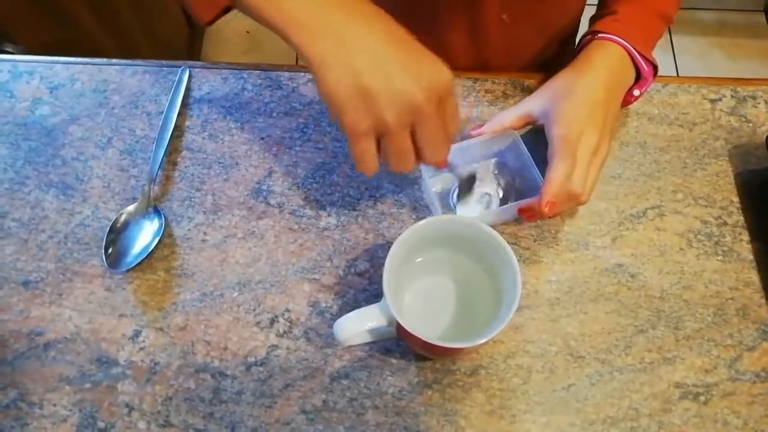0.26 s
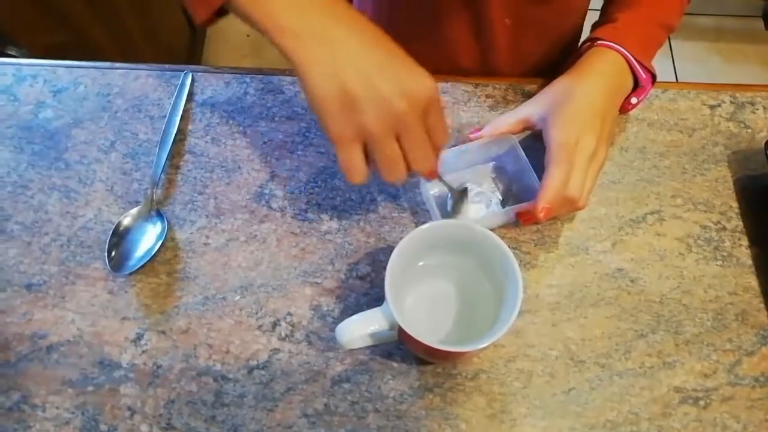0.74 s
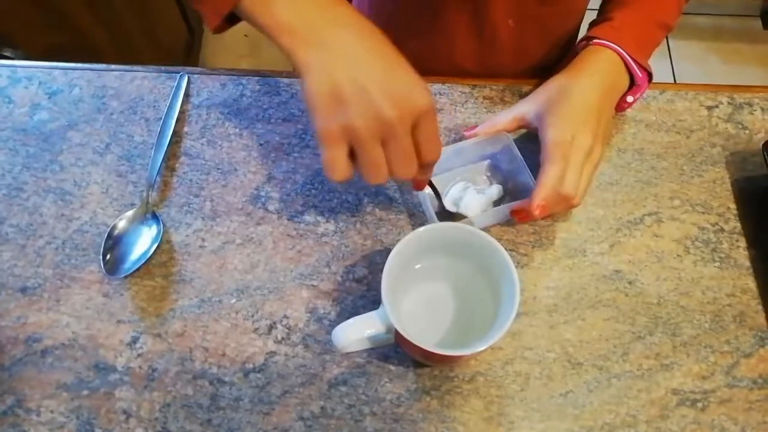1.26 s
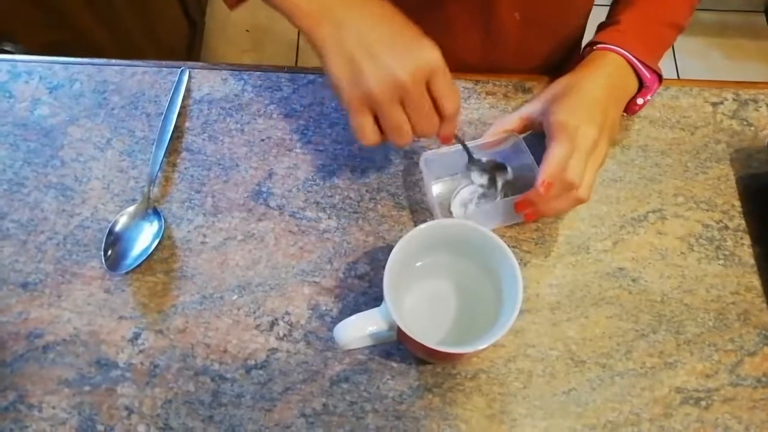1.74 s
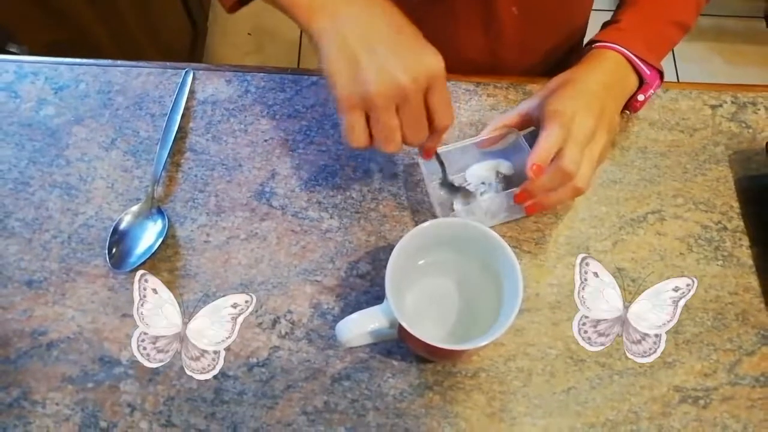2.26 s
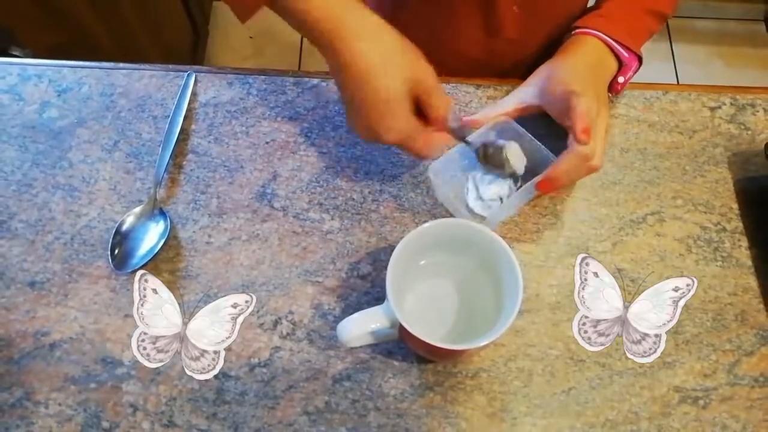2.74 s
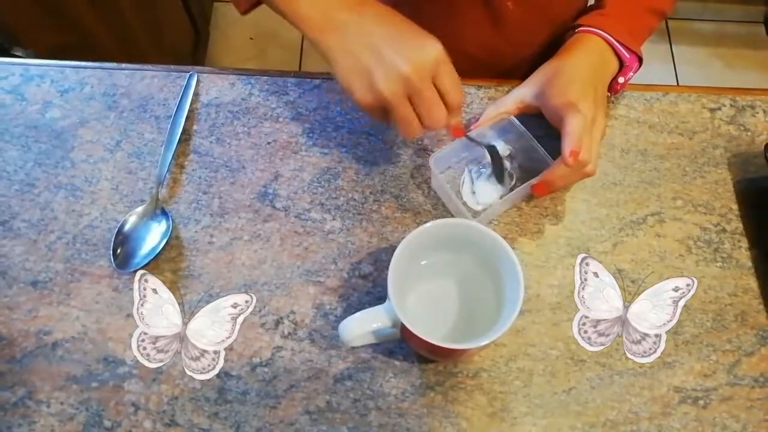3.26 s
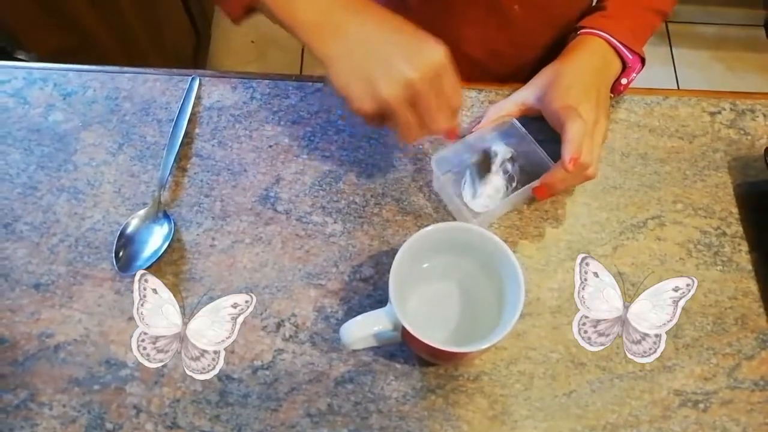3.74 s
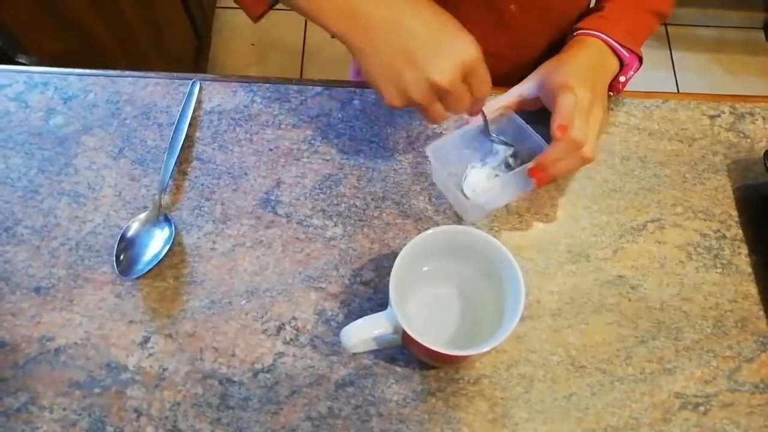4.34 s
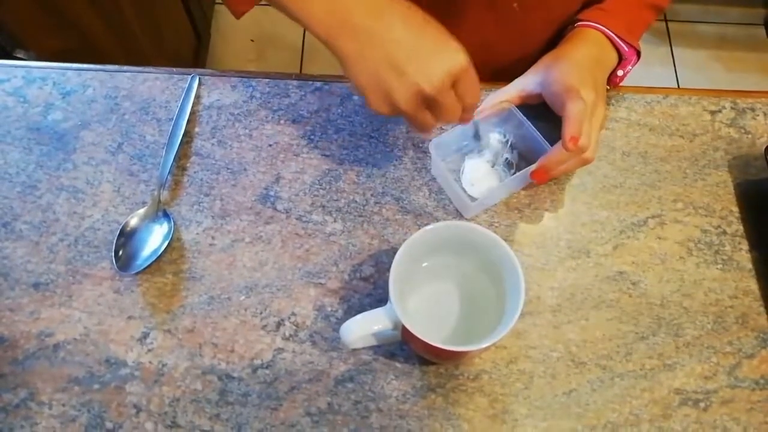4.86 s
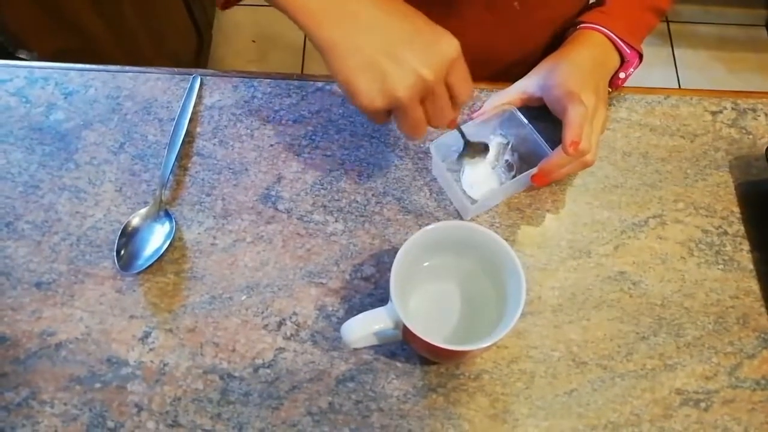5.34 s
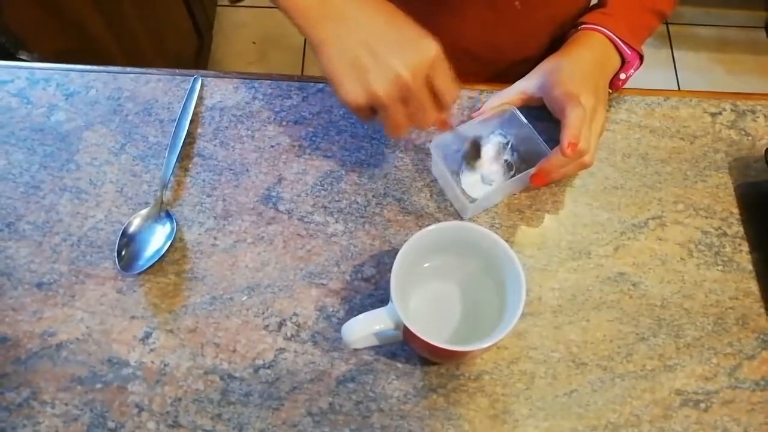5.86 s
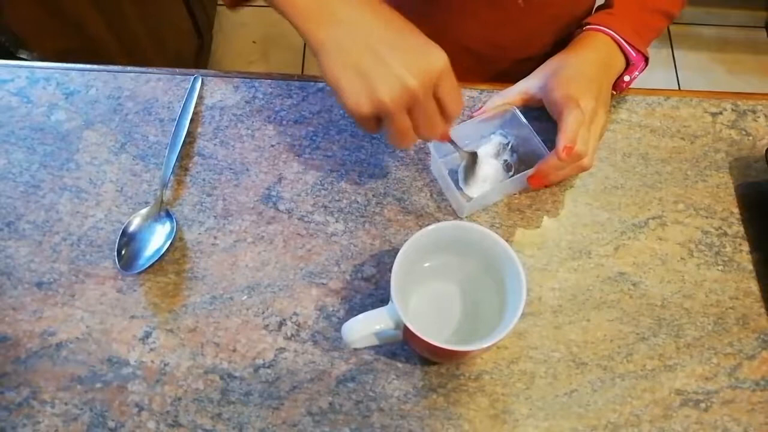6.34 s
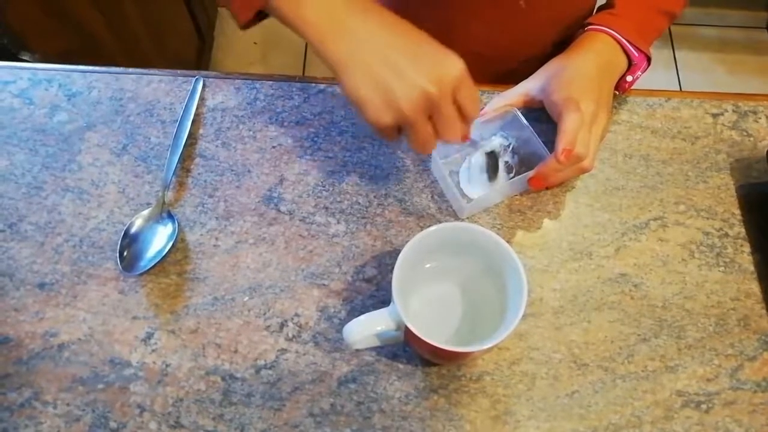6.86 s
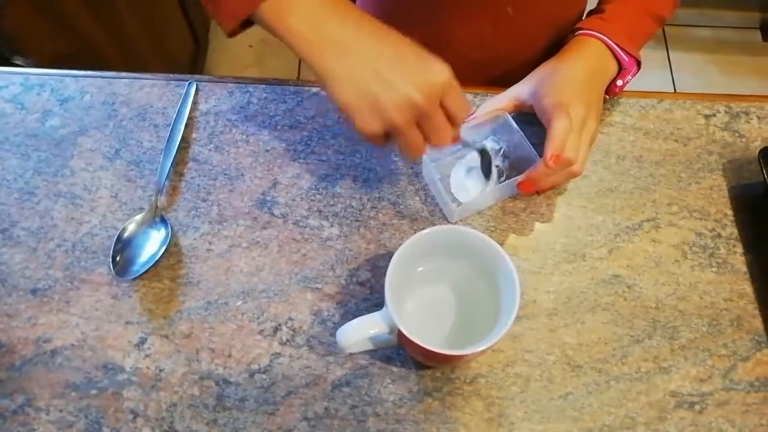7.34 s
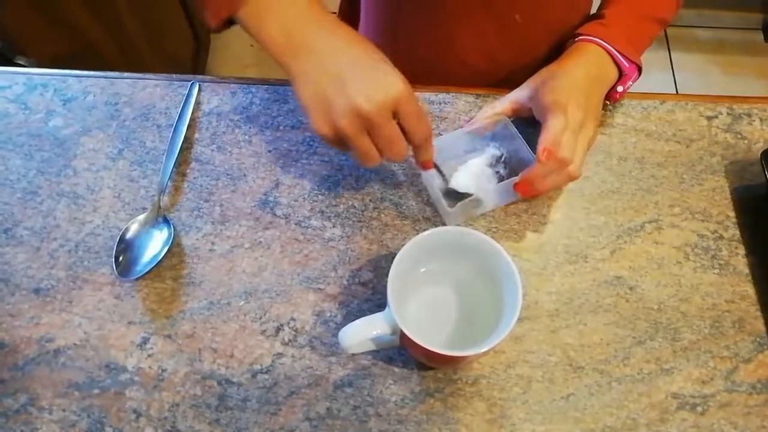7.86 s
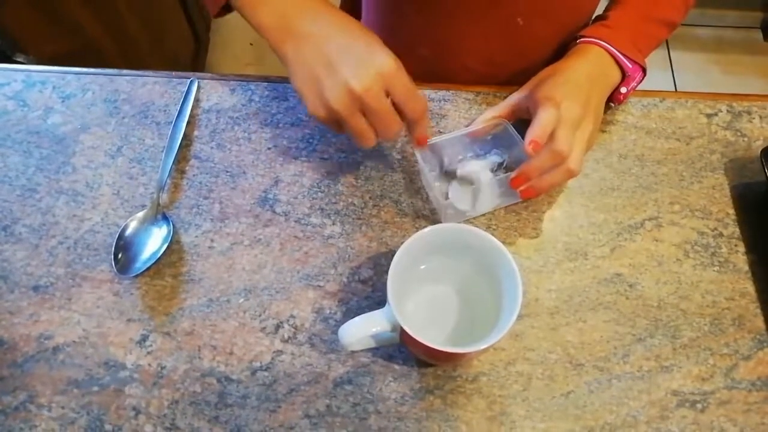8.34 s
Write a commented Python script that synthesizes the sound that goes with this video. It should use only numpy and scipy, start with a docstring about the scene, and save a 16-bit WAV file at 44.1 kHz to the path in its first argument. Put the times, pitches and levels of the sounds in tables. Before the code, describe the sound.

Close up in a reflective kitchen, a metal spoon stirs thick slime in a small plastic tub. Faint scrapes and wet ticks come first, then a burst of loud hollow clicks with light counter bumps. Clicks become sparser, with soft sticky rubbing in a quieter stretch, before a brief skid and a quick run of clacks at the end. Low room noise and a faint hum lie beneath.

```python
"""Kitchen counter: a metal spoon stirs thick slime in a small hand-held plastic tub.
Clicks: short noise chatter through tub resonances plus a decaying tone of the hollow.
Strokes: noise gated by tiny slips through the same resonances, with chirps for wet ticks and squelches.
Now and then the tub bumps the counter (low modes and a noise thud); once the spoon skids.
Decaying-noise echoes give a hard-walled kitchen, over room noise, faint drones and a hum."""
import sys
import numpy as np
from scipy import signal
from scipy.fft import rfft, irfft, next_fast_len
from scipy.io import wavfile
from scipy.ndimage import uniform_filter1d

SR = 44100
rng = np.random.default_rng(int(sys.argv[2]) if len(sys.argv) > 2 else 0)


def pcm_store(signal):
    """Save signal as 16-bit PCM."""
    levels = np.round(np.clip(np.atleast_2d(signal), -1, 1) * 32767)
    wavfile.write(sys.argv[1], SR, levels.astype(np.int16).T)


N = 378819

# tub floor resonances: (frequency [Hz], width [Hz], relative level [dB])
FLOOR_MODES = [(640, 314, -10), (1240, 300, 8)]
# tub hollow resonances: (frequency [Hz], width [Hz], relative level [dB])
HOLLOW_MODES = [(1330, 35, 3.5), (1583, 143, 14.5), (1874, 300, 8)]
# tub wall resonances: (frequency [Hz], width [Hz], relative level [dB])
WALL_MODES = [(2186, 500, -5.5), (2930, 197, 5.5), (3420, 123, 4), (4135, 780, -4)]
# sharp contact resonances: (frequency [Hz], width [Hz], relative level [dB])
SNAP_MODES = [(5640, 660, 1), (6430, 350, 7), (8480, 2430, -1.5), (9840, 480, 5.5), (10900, 1430, -10)]
# spoon strokes along the wall: (middle [s], length [s], hollow level [dB], hiss level [dB])
WALL_STROKES = [(0.035, 0.72, -75.5, -73), (0.339, 0.033, -72, -60), (0.593, 0.067, -58, -60.5),
                (0.687, 0.041, -60.5, -57), (0.811, 0.057, -91, -58.5), (0.918, 0.092, -68, -57),
                (1.055, 0.021, -61, -60.5), (1.863, 0.042, -63, -48.5), (2.182, 0.038, -49, -46.5),
                (3.436, 0.13, -94, -65), (3.565, 0.12, -79, -63.5), (3.659, 0.037, -72, -53.5),
                (3.728, 0.033, -55, -59), (3.891, 0.04, -49, -53.5), (4.096, 0.029, -62, -59),
                (4.878, 0.057, -64, -64.5), (5.948, 0.093, -70, -59), (6.12, 0.15, -78, -66),
                (6.342, 0.076, -70, -65.5), (6.5, 0.09, -67.5, -66), (6.722, 0.13, -73, -67),
                (6.919, 0.18, -68.5, -66.5), (7.181, 0.077, -77, -63.5), (7.315, 0.096, -80, -67),
                (7.416, 0.071, -79, -63), (7.543, 0.042, -75, -61.5), (7.667, 0.064, -82, -65),
                (7.97, 0.052, -52, -53.5), (8.133, 0.051, -75, -54)]
SOFT_TOP_HZ = 11520  # upper edge of the rubbing and the room noise


def amp(db):
    """Amplitude factor of a level in dB."""
    return 10 ** (np.asarray(db) / 20)


def unit(x):
    """Scaled to rms 1."""
    return x / np.sqrt(np.mean(x ** 2) + 1e-20)


def packed(x, seconds):
    """Scaled to the energy of a sound of rms 1 that lasts so many seconds."""
    return unit(x) * np.sqrt(seconds * SR / x.shape[-1])


def along(points, hz):
    """Interpolates (Hz, value) points on a log frequency axis."""
    f, v = np.transpose(points)
    return np.interp(np.log(hz + 1), np.log(f + 1), v)


def filtered(x, response):
    """Applies a complex response of frequency."""
    n = x.shape[-1]
    m = next_fast_len(n + 1024)
    return irfft(rfft(x, m) * response(np.fft.rfftfreq(m, 1 / SR)), m)[..., :n]


def soften(x, top_hz):
    """Takes away the treble above top_hz."""
    return filtered(x, lambda hz: 1 / (1 + (hz / top_hz) ** 30))


def resonate(x, modes):
    """Sum of resonances of alternating sign, which radiate little below the lowest one."""
    edge_hz = .7 * modes[0][0]

    def response(f):
        ringing = 0
        for k, (centre, width, db) in enumerate(modes):
            band = 1j * f * width
            ringing = ringing + (-1) ** k * amp(db) * band / (centre * centre - f * f + band)
        low_cut = f * f / (f * f - edge_hz * edge_hz - 1j * np.sqrt(2) * f * edge_hz)
        return ringing * low_cut

    return filtered(x, response)


def struck(modes, detune):
    """A new contact spot detunes the resonances together and favours some of them."""
    spot_db = 3.5  # spread of each resonance's level
    stretch, *luck = rng.standard_normal(len(modes) + 1).clip(-2, 2)
    return [(hz * (1 + detune * stretch), width, db + spot_db * k)
            for (hz, width, db), k in zip(modes, luck)]


def add(track, s, sound):
    """Mixes a stereo sound in at time s."""
    start = max(round(s * SR), 0)
    part = sound[:, :max(N - start, 0)]
    track[:, start:start + part.shape[1]] += part


def pair(x, alike):
    """Mixes two unrelated signals to a left and right of the given likeness."""
    turn = np.arccos(np.clip(alike, -1, 1)) / 2
    mid, side = np.cos(turn) * x[0], np.sin(turn) * x[1]
    return np.array([mid + side, mid - side])


def patchy(x, depth_db):
    """Random gain in patches a few hundred Hz wide and some 30 ms long."""
    z = signal.stft(x, nperseg=256)[2]
    field = uniform_filter1d(rng.standard_normal(z.shape[1:]), size=4, axis=0)
    field = uniform_filter1d(field, size=12, axis=1)
    return signal.istft(z * amp(depth_db * unit(field)), nperseg=256)[1][:, :N]


def kitchen(build_s=0.0031, gather_s=0.12, spiky=0.26):
    """A fresh echo of energy 1: short gap, uneven first reflections, a tail that dies faster in the treble."""
    # decay of the tail: (frequency [Hz], t60 [s])
    decay = [(300, 1), (1700, 0.68), (7000, 0.53), (10800, 0.4), (13000, 0.24)]
    hz, t, z = signal.stft(rng.standard_normal((2, SR // 3)), SR, nperseg=256)
    tail = signal.istft(z * amp(-60 * t / along(decay, hz)[:, None]), SR, nperseg=256)[1]
    t = np.arange(tail.shape[1]) / SR
    near_walls = 1 + 2.7 * np.exp(-t / 0.007)
    clumps = np.interp(t, t[::100], rng.standard_normal(len(t[::100])).clip(-2, 2))
    unevenness = np.exp(spiky * clumps / (1 + t / gather_s))
    gap = (1 - np.exp(-(t / build_s) ** 2)) ** 2
    tail = tail * near_walls * unevenness * gap
    return tail / np.linalg.norm(tail[0])


def with_echo(x, echo_db):
    """Adds the kitchen's answer to a whole track."""
    return x + amp(echo_db) * signal.fftconvolve(x, kitchen(), axes=1)[:, :N]


def room_tone(air_db=-61.5, hum_hz=167, waver=0.36):
    """Room noise, alike in the bass, with faint wavering drones and a low hum that comes and goes."""
    # noise spectrum: (frequency [Hz], relative density [dB per Hz])
    spectrum = [(15, -47), (25, -17), (172, -13), (215, -8.5), (250, -17), (309, -15), (394, -17.5),
                (558, -26.5), (1030, -22.5), (2700, -26), (6900, -29), (11200, -32.5), (15000, -42)]
    # stereo likeness of the noise: (frequency [Hz], likeness [-])
    likeness = [(100, 0.95), (290, 0.62), (640, 0.011)]
    # hum: (time [s], level [dB])
    hum_levels = [(0, -85), (1.1, -61.5), (1.6, -75.5), (3.3, -65), (5.5, -77), (6.2, -84)]
    # drones: (frequency [Hz], level [dB])
    drones = [(91.5, -75.5), (210, -76.5)]
    hz, t = np.fft.rfftfreq(N, 1 / SR), np.arange(N) / SR
    noise = pair(rfft(rng.standard_normal((2, N))), along(likeness, hz))
    air = patchy(irfft(noise * amp(along(spectrum, hz)), N), depth_db=1.6)

    def drift():
        return np.interp(t * 6, np.arange(64), rng.standard_normal(64))

    def tone(pitch_hz):
        return unit((1 + waver * drift()) * np.sin(2 * np.pi * pitch_hz * t + drift()))

    hum = amp(np.interp(t, *np.transpose(hum_levels))) * tone(hum_hz)
    hum = hum + sum(amp(db) * tone(pitch_hz) for pitch_hz, db in drones)
    return amp(air_db) * unit(soften(air, SOFT_TOP_HZ)) + hum


def rubbing(slips_per_s=260, slip_db=3.5, smear=0.063, hiss_smear=0.1, detune=0.04, drag=0.043):
    """Tiny slips of the spoon, loudest in mid-stroke, sound through the tub; each stroke retunes it."""
    out, t = np.zeros((2, N)), np.arange(-SR // 6, SR // 6) / SR
    for s, length, hollow_db, hiss_db in WALL_STROKES:
        # the spoon drags softly before and after the push
        swell = np.exp(-np.minimum((t / (.75 * length)) ** 2, 50)) + drag * np.hanning(len(t))
        slips = rng.random(len(t)) < slips_per_s / SR
        slips = slips * amp(slip_db * rng.standard_normal(len(t)).clip(-2, 2))
        friction = swell * pair(rng.standard_normal((2, len(t))), alike=.5)
        parts = ((hollow_db, HOLLOW_MODES, smear), (hiss_db - 3.0, WALL_MODES, smear),
                 (hiss_db, SNAP_MODES, hiss_smear))
        for db, modes, steady in parts:
            sound = resonate((slips + steady) * friction, struck(modes, detune))
            add(out, s + t[0], amp(db) * packed(sound, length))
    # the shifting slime damps now one resonance, now another
    out = patchy(out, depth_db=3.2)
    return soften(with_echo(out, -4.0), SOFT_TOP_HZ)


def pop(hz, life_s, rise=0.067):
    """A small air pocket bursts: a brief, slightly rising chirp of peak 1."""
    t = np.arange(SR // 50) / SR
    chirp = np.sin(2 * np.pi * hz * t * (1 + rise * t / life_s)) * t * np.exp(-3 * t / life_s)
    return chirp / np.abs(chirp).max() * np.ones((2, 1))


def wet_ticks(ticks_per_s=75, over_hiss_db=5, life_s=0.0032, middle_hz=2017):
    """Along the strokes single air pockets of all sizes burst, each at its own pitch."""
    out = np.zeros((2, N))
    for s, length, _, hiss_db in WALL_STROKES:
        draws = rng.standard_normal((round(ticks_per_s * length), 3)).clip(-1.7, 1.7)
        for when, size, strength in draws:
            tick = pop(middle_hz * np.exp(.4 * size), life_s)
            add(out, s + when * length / 2, amp(hiss_db + over_hiss_db + 2.6 * strength) * tick)
    return out + .5 * signal.fftconvolve(out, kitchen(), axes=1)[:, :N]


def click_levels(strength_db, hardness_db):
    """Levels of hollow, knock, wall, snap, echo: bare plastic is bright, a slime-coated spot soft and hollow."""
    hollow_db = strength_db - 9
    knock_db = strength_db - 12.5 + 0.6 * hardness_db
    wall_db = strength_db - 8 + 0.5 * hardness_db
    snap_db = strength_db - 5.5 + 0.89 * hardness_db
    extra_db = strength_db + 29  # over an ordinary firm click
    knock_db -= 0.13 * extra_db  # the slime cushions the floor
    return hollow_db, knock_db, wall_db, snap_db, -1.5 - 0.18 * extra_db


def clicks(contact_s=0.002, glide_s=0.00013, crack_s=0.0024, overtone=2.12, overtone_db=-13):
    """The spoon chatters on the plastic for a moment and sets the tub's hollow ringing."""
    # spoon meets tub: (time [s], strength [dB], contact hardness [dB], hollow pitch [Hz])
    contacts = [(0.198, -47.5, -23, 1450), (0.3554, -41.5, -27, 1610), (0.4872, -42, -24, 1454),
                (0.6938, -47, -15, 1600), (0.847, -47.5, -19, 1450), (1.0853, -41.5, -12, 1800),
                (1.1203, -48, -20, 1360), (1.2073, -41, -26, 1645), (1.3481, -31.5, 12, 1890),
                (1.4238, -29.5, -4, 1660), (1.6043, -18, -10, 1784), (1.7438, -35, 13.5, 1740),
                (1.7804, -22, -8, 1745), (2.005, -19, -6.5, 1740), (2.0218, -19, -9, 1676),
                (2.2257, -17, -9, 1730), (2.457, -20.5, -3.5, 1700), (3.1341, -31.5, -7.5, 1935),
                (3.1457, -36, -20, 1500), (3.4699, -35.5, -18, 1730), (3.801, -42, -14, 1680),
                (3.869, -46.5, -13, 1710), (4.03, -40, -19, 1825), (4.4594, -28, -6, 1820),
                (4.4619, -22.5, -11.5, 1730), (5.0973, -28, 0, 1680), (5.138, -31, -30, 1790),
                (5.1819, -24, -25.5, 1618), (5.6156, -22, -32.5, 1627), (5.731, -46, -47, 1840),
                (5.8225, -46.5, -14, 1550), (6.2292, -49, -34, 1610), (6.323, -48, -36, 1650),
                (7.1416, -47.5, -22, 2100), (7.555, -50.5, -23, 1620), (7.587, -44, -23.5, 1650),
                (7.8231, -30, 10, 1730), (7.9589, -36, -17, 1770), (7.992, -24.5, -11, 1780),
                (8.058, -40, -25, 1700), (8.107, -36.5, -13, 1750), (8.1285, -29.5, -19.5, 1577),
                (8.2949, -22.5, -13.5, 1790), (8.3702, -31.5, -10.5, 1680), (8.3926, -26, -16.5, 1556),
                (8.531, -21, -5.5, 1800)]
    # lean of the click to one side: (time [s], left minus right [dB])
    lean = [(1.6, -5), (2.1, 12.5), (2.5, -10), (5.3, 0), (8.5, 0)]
    out, t = np.zeros((2, N)), np.arange(SR // 20) / SR
    blow_s, detune = .01, 0.017
    usual_hollow_hz, echo_top_hz = 1743, 13000
    muffled_db = -36  # softer contacts lose the overtone
    for s, strength_db, hardness_db, hz in contacts:
        hollow_db, knock_db, wall_db, snap_db, room_db = click_levels(strength_db, hardness_db)
        # after a soft tap the tub rings freely; a hard blow pins and damps it
        freedom = np.interp(hollow_db - snap_db, [8, 18], [0, 1])
        t60_s = np.interp(freedom, [0, 1], [.007, .014])
        rattle = np.interp(freedom, [0, 1], [.95, .55])
        # the lightest touches are choked by the slime
        t60_s *= np.interp(strength_db, [-40, -30], [.7, 1])
        onset = 1 - np.exp(-t / glide_s)
        force = (np.exp(-(t / contact_s) ** 2) + 0.35 * np.exp(-t / 0.004)) * onset
        chatter = force * pair(rng.standard_normal((2, len(t))), alike=0.22)
        # only the first instant of contact is sharp enough to snap
        bite = chatter * np.exp(-t / crack_s)
        # the ring reaches the two microphones slightly out of step
        phase = 2 * np.pi * hz * t + 0.068 * np.array([[-1], [1]])
        shine = amp(overtone_db) / (1 + amp(muffled_db - hardness_db) ** 2)
        ring = np.sin(phase) + shine * np.sin(overtone * phase)
        ring = ring * amp(-60 * np.minimum(t / t60_s, 2) ** 2) * onset
        echo = kitchen()
        ring_echo = signal.fftconvolve(echo, ring, axes=1)[:, :echo.shape[1]]
        # a louder snap reaches further into the treble
        top_hz = 12700 + 113 * (snap_db + 41)
        levels_and_modes = ((knock_db, FLOOR_MODES), (wall_db, WALL_MODES), (snap_db, SNAP_MODES))
        parts = [(db, struck(modes, detune)) for db, modes in levels_and_modes]
        # the hollow's resonances follow the pitch of each click
        cavity = [(centre * hz / usual_hollow_hz, width, db) for centre, width, db in HOLLOW_MODES]
        lean_db = np.interp(s, *np.transpose(lean)) * np.array([[.5], [-.5]])
        # the same resonances are heard directly and, spread out, from the walls
        direct = (chatter, bite, ring, 0, lean_db, top_hz)
        reflected = (echo, echo, ring_echo, room_db, 0, min(top_hz, echo_top_hz))
        for drive, sharp, tone, path_db, side_db, edge_hz in (direct, reflected):
            hollow = unit(tone) + rattle * unit(resonate(drive, cavity))
            sound = amp(hollow_db + side_db) * packed(hollow, blow_s)
            for (db, modes), push in zip(parts, (drive, drive, sharp)):
                sound = sound + amp(db) * packed(resonate(push, modes), blow_s)
            add(out, s, amp(path_db) * soften(sound, edge_hz))
    return out


def bumps(attack_s=0.00018, scatter_db=2, thud_db=-9, thud_t60_s=0.78):
    """The tub lands with a rough, broad thud and the counter's low modes ring at new strengths."""
    # tub bumps the counter: (time [s], level [dB])
    landings = [(0.201, -56), (0.485, -45), (1.206, -49), (1.35, -42.5), (1.426, -33.5), (1.606, -44.5),
                (2.458, -40.5), (3.138, -50.5), (5.617, -55.5), (7.824, -50)]
    # thud of the tub's base: (frequency [Hz], width [Hz], relative level [dB])
    base_modes = [(123, 44, -2.5), (290, 280, -6.5)]
    # counter top modes: (frequency [Hz], mean relative level [dB], t60 [s])
    counter_modes = [(95, -1.5, 0.11), (172.6, 6.5, 0.11), (210.2, 4.5, 0.61), (245, -5.5, 0.42),
                     (307, 0, 0.33), (469, -11, 0.17)]
    out, t = np.zeros((2, N)), np.arange(SR // 2) / SR
    for s, db in landings:
        ring = 0
        for hz, level_db, t60_s in counter_modes:
            decay = amp(level_db + rng.normal(0, scatter_db) - 60 * t / t60_s)
            ring = ring + decay * np.sin(2 * np.pi * (hz * t + rng.random()))
        thud = resonate(rng.standard_normal(len(t)) * amp(-60 * t / thud_t60_s), base_modes)
        thud = filtered(thud, lambda hz: 1 / (1 + (hz / 400) ** 4))
        sound = (unit(ring) + amp(thud_db) * unit(thud)) * (1 - np.exp(-t / attack_s))
        add(out, s, amp(db) * packed(sound, seconds=0.016) * np.ones((2, 1)))
    return with_echo(out, -15.0)


def squelches(spread_s=0.013, life_s=0.0049, pitch_spread=.09, count=7):
    """The slime tears off the spoon: a cluster of air pockets of about one size pops."""
    # tears: (time [s], middle peak level of a pop [dB], middle pitch [Hz])
    tears = [(0.641, -52.5, 2800), (0.904, -52, 3000), (5.951, -67, 2800), (6.169, -63, 2770),
             (6.591, -64.5, 2860), (7.051, -61, 3000), (7.19, -53, 3080), (7.43, -57, 3150),
             (7.66, -59.5, 3280)]
    out = np.zeros((2, N))
    for s, db, hz in tears:
        for when, size, strength in rng.standard_normal((count, 3)).clip(-1.7, 1.7):
            burst = pop(hz * np.exp(pitch_spread * size), life_s)
            add(out, s + when * spread_s, amp(db + 2 * strength) * burst)
    return with_echo(out, -3)


def skid(slips_per_s=500):
    """After a hard click, quick uneven slips of the spoon's edge shake the floor of the tub."""
    # one skid: (middle [s], length [s], level [dB])
    floor_skid = (7.885, 0.089, -49.5)
    middle_s, length_s, db = floor_skid
    t = np.arange(N) / SR
    slips = rng.random(N) < slips_per_s / SR
    slips = slips * pair(rng.standard_normal((2, N)), alike=0.22)
    swell = np.exp(-np.minimum(((t - middle_s) / (length_s / 2)) ** 2, 50))
    return with_echo(amp(db) * swell * unit(resonate(slips, FLOOR_MODES)), 1)


def scene(lag_s=.000025):
    """The stirring reaches the left microphone a little later, and each colours it differently."""
    # microphone colour: (frequency [Hz], left minus right [dB])
    balance = [(600, -2), (1000, 1), (1600, 0), (2400, 6), (4300, -2), (8000, 1)]
    stirring = rubbing() + wet_ticks() + clicks() + bumps() + squelches() + skid()
    side = np.array([[.5], [-.5]])

    def microphones(hz):
        return amp(side * along(balance, hz)) * np.exp(-2j * np.pi * hz * lag_s * side)

    return filtered(stirring, microphones) + room_tone()


def record(dry, top_hz=15800):
    """Band limit: nothing is kept from top_hz up."""
    return filtered(dry, lambda hz: hz < top_hz)


dry = scene()
out = record(dry)
pcm_store(out)
```